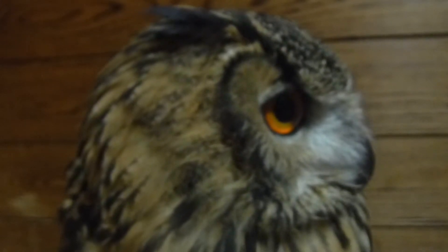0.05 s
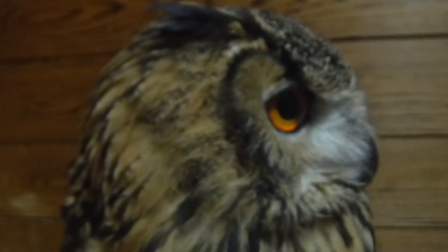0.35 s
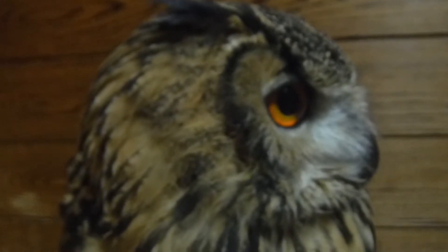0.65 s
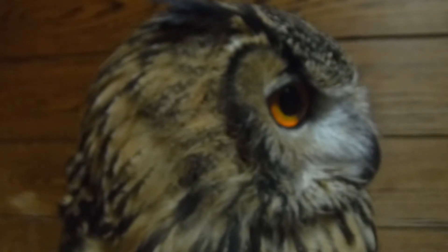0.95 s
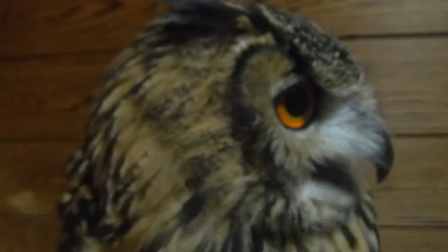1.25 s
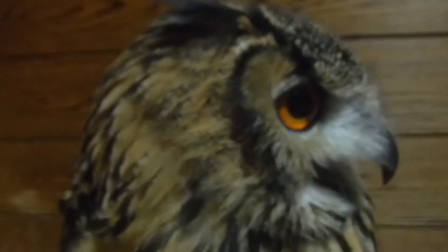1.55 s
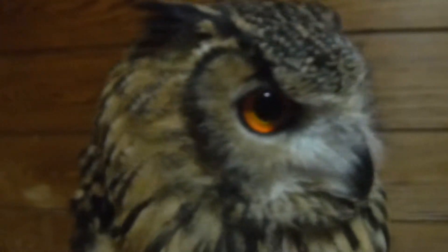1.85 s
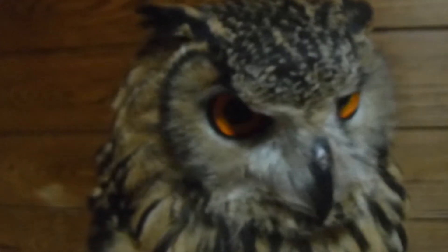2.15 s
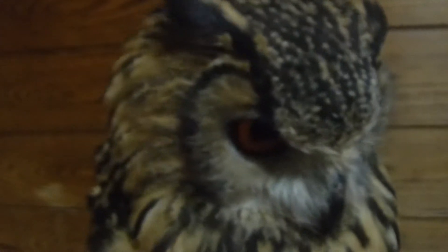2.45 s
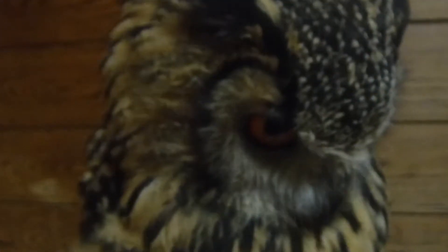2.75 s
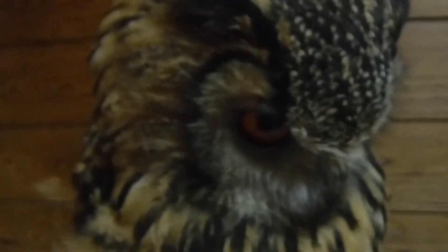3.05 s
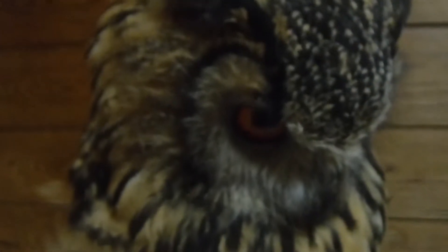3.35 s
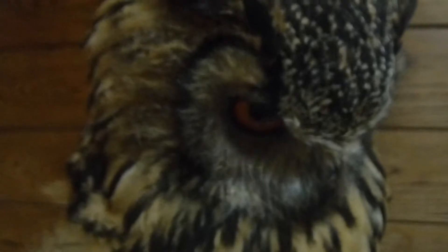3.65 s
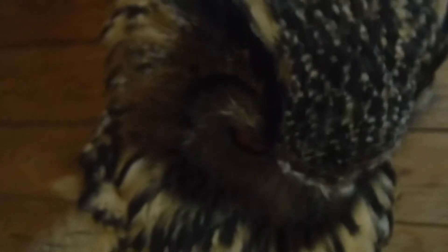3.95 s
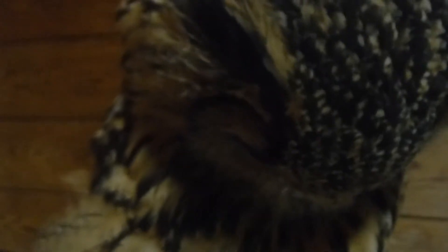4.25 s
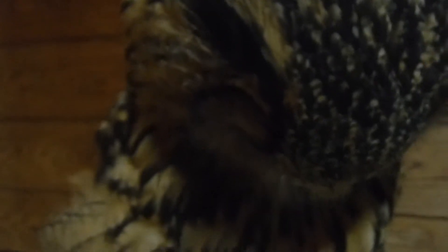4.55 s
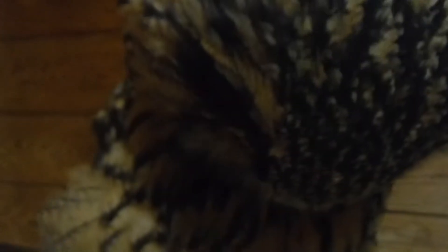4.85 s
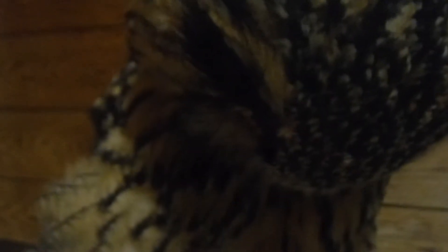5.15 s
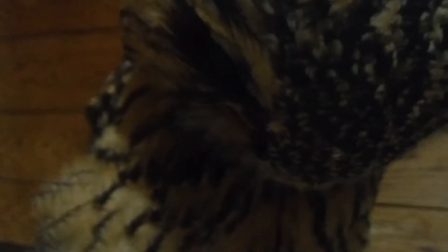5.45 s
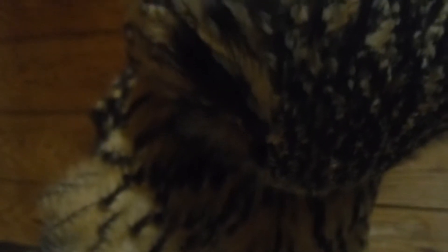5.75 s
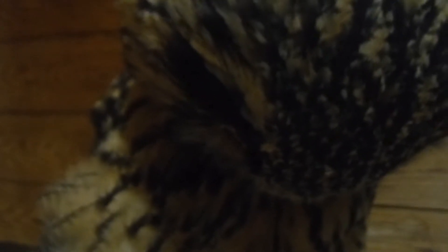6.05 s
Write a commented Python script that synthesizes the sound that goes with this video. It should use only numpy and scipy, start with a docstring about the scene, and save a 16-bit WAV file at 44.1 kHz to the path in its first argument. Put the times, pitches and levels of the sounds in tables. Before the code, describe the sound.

In a quiet wooden room, a large owl opens its beak with tiny wet clicks and lets out one short, loud screech. It starts as a croaky tone, breaks into a shrill, rasping whistle and slightly overloads the close microphone. After a pause comes a faint breathy swish, then a quick run of soft, muffled clucks. Faint hum, hiss and a little low handling rumble lie underneath.

```python
"""Eagle owl screech, close up.

A small wooden room, one microphone close to the bird. Its one screech overloads the input: the syrinx
croaks, rises to a clear tone, breaks into a shrill whistle over rasping air, and sputters out.
A faint, breathy swish starts suddenly and fades, then soft clucks pop behind the shut beak.
Underneath lie faint hum and hiss, and the low rumble and soft bumps of the microphone being handled."""
import sys
import numpy as np
from scipy import signal
from scipy.fft import rfft, irfft, next_fast_len
from scipy.io import wavfile

SR = 44100
rng = np.random.default_rng(int(sys.argv[2]) if len(sys.argv) > 2 else 0)


def wrap_up_sound(samples):
    """Save the sound to the file named by the first command line argument, as 16-bit audio."""
    columns = np.atleast_2d(samples).T
    # keep every value between -1 and 1, then stretch to whole-number steps
    tamed = np.clip(columns, -1, 1)
    steps = np.round(tamed * 32767).astype(np.int16)
    wavfile.write(sys.argv[1], SR, steps)


N = 278271
TIME = np.arange(N) / SR

# Air pressure behind the cry. Each row: time in seconds, effort in dB.
EFFORT = [(1.236, -36), (1.243, -24), (1.27, -16.5), (1.279, -7.5), (1.32, -2), (1.41, -0.5), (1.496, -4.8),
          (1.504, -12), (1.518, -17.5), (1.532, -34)]
# The low tone of the syrinx, and its shriek after the break. Each row: time in seconds, pitch in Hz.
TONE_PITCH = [(1.24, 750), (1.266, 833.4), (1.277, 751), (1.295, 769.3), (1.315, 803.4), (1.345, 826.2),
              (1.374, 828), (1.386, 880)]
SHRIEK_PITCH = [(1.385, 2538), (1.405, 2669), (1.447, 2644), (1.487, 2749), (1.498, 2490), (1.52, 2700)]
# The low tone catches again for an instant. Each row: time in seconds, level in dB.
RELAPSES = [(1.448, -11.5), (1.514, -12.5)]
# The open throat, for the tone and for the rasp. Each row: frequency in Hz, gain in dB.
TONE_COLOUR = [(200, -25), (500, -3), (820, -3), (1600, -4.5), (2450, -2), (3250, -2), (4050, -21),
               (5000, -5), (5800, -8.5), (7000, -12.5), (8500, -26.5), (12000, -57)]
RASP_COLOUR = [(50, -22), (250, -18), (500, -15), (900, -16), (1250, -18), (2000, -6.5), (2600, -1.5),
               (3100, -3), (3700, -1.3), (4400, -2.3), (5100, -2.8), (6400, -7.5), (7300, -20), (8400, -21),
               (12000, -49)]
# Bursts of air as the cry catches and as it dies.
# Each row: start and end in seconds, bursts a second, first and last level in dB.
SPUTTERS = [(1.2481, 1.27, 200, -23, -18), (1.503, 1.528, 265, -9, -15)]
# Croaks before the cry. Each row: start and length in seconds, pitch in Hz, level in dB.
CROAKS = [(1.2057, .0075, 558.3, -26), (1.2227, .0105, 679.7, -26.5)]
# Wet clicks as the beak opens. Each row: time in seconds, level in dB.
SMACKS = [(1.204, -21.5), (1.2109, -12.5), (1.2236, -18.5), (1.2332, -19.5)]
# Throat clucks. Each row: start in seconds, level in dB, number of pops, snap of the upper modes in dB.
CLUCKS = [(3.519, -39, 1, 8), (3.571, -36.5, 1, 0), (3.609, -42, 1, 0), (3.6528, -33.5, 1, 5),
          (3.6828, -37, 2, 0), (3.7229, -37, 1, -4), (3.731, -37, 1, 5), (3.738, -33.5, 2, 1),
          (3.7607, -32.5, 3, 9.5), (3.7795, -29, 3, 4), (3.8063, -30, 3, 7), (3.835, -28.5, 3, 9),
          (3.8634, -28.5, 3, 5.5), (3.9206, -27.5, 2, -5), (3.954, -41, 1, 0), (3.998, -31.5, 2, -1),
          (4.0433, -25, 1, -2)]
# The shut throat, four low and four upper modes. Each row: frequency in Hz, level in dB, t60 in seconds.
CLUCK_MODES = [(780, -19, .016), (865, .5, .019), (1040, -13, .024), (1830, -26, .017), (2720, -24, .0062),
               (3480, -28, .0085), (4620, -29, .008), (5115, -24, .0077)]
# Soft bumps of the microphone being handled. Each row: time in seconds, level in dB.
BUMPS = [(3.36, -49), (4.03, -52), (4.26, -52), (4.4, -50), (4.53, -53), (4.79, -47)]
# Spectra of the swish and of the handling rumble. Each row: frequency in Hz, gain in dB.
SWISH_COLOUR = [(150, -20), (300, -3), (520, 3), (680, -17), (1300, -11), (2300, -13), (4200, -21),
                (8000, -31)]
RUMBLE_COLOUR = [(15, -3.5), (40, 1.5), (85, -3.5), (160, -15), (500, -44.5)]
# Spectra of the wall reflections, the room air and the hiss. Each row: frequency in Hz, gain in dB.
WALL_COLOUR = [(100, -6), (500, 3.5), (900, 3.5), (1500, -1), (2700, -2.5), (5500, 0), (9000, -2.5),
               (14000, -11.5)]
AIR_COLOUR = [(20, 2), (50, 3), (130, -2), (215, -2), (275, 0.5), (330, -4), (600, -12.5), (1050, -15),
              (1280, -10), (1550, -14), (2050, -23), (4100, -25), (4400, -18.5), (5400, -26), (5900, -23.5),
              (8000, -29.5), (15500, -31)]
HISS_COLOUR = [(800, -30), (2200, -1.5), (4000, 2.5), (6500, -5), (10000, -25.5)]
# Hum and thin whine in the room. Each row: frequency in Hz, level in dB.
HUM = [(274.5, -61), (360.7, -71), (4382, -80), (4942, -78), (6842, -80), (13690, -88.5)]

# The voice locks into a clear tone, then breaks; each change of register takes a moment.
LOCK_S, BREAK_S, CHANGE_S = 1.273, 1.385, .01


def tone(effort_db, full_db=-.5, broken_drop_db=21, loose_rough=.9, locked_rough=.38, rough_per_db=.14):
    """The low voice follows the effort: rough at first, clear once locked, fitful after the break."""
    hz, = in_time(TONE_PITCH)
    locked = after(LOCK_S) - after(BREAK_S)
    rough = locked * np.clip(locked_rough + rough_per_db * effort_db, 0, 1) + (1 - locked) * loose_rough
    gain = from_db(full_db + effort_db - broken_drop_db * after(BREAK_S))
    gain += swells(RELAPSES, rise_s=.006, fall_s=.005)
    return syrinx(hz, 20 * np.log10(gain * during(EFFORT) + 1e-9), rough)


def syrinx(hz, level_db, rough, jitter=.085, shimmer_db=5.0, half_db=-10, slip_rad=.055, soft_tilt=.28):
    """Pulses shaped by the throat; alternate cycles differ, adding faint lines between the overtones."""
    phase = phase_of(hz * (1 + jitter * rough ** 2 * drift(300)))
    phase += slip_rad * drift(900)   # pulses come early or late, which blurs the high overtones
    on = level_db > -70
    hz, phase = hz[on], phase[on]
    halves = from_db(half_db) * rough[on] * (1 + .5 * drift(27)[on])
    wave, power = 0, 0
    for k in np.arange(1, 15):
        tilt = from_db(soft_tilt * level_db[on] * np.log2(k))   # a soft voice is duller
        gain = tilt * gain_at(TONE_COLOUR, k * hz)
        half_gain = tilt * halves * gain_at(RASP_COLOUR, (k + .5) * hz)
        lag = .048 * k * k   # the throat delays each overtone differently and smears the pulse
        wave += gain * np.sin(k * phase + lag) + half_gain * np.sin((k + .5) * phase + lag)
        power += gain ** 2 / 2
    out = np.zeros(N)
    out[on] = wave / np.sqrt(power)
    return out * from_db(level_db + shimmer_db * rough * np.tanh(drift(250)))


def shriek(effort_db, jitter=.03, shimmer_db=2.5, apart_hz=160, second_db=-6, attack_s=.016):
    """After the break the two sides of the syrinx whistle apart: they beat and couple into a sum tone."""
    hz, = in_time(SHRIEK_PITCH)
    first = phase_of(hz * (1 + jitter * drift(300)))
    second = phase_of((hz - apart_hz) * (1 + jitter * drift(300)))
    sum_tone = from_db(-2.8 + 2.8 * effort_db) * np.sin(first + second)
    wave = np.sin(first) + from_db(second_db) * np.sin(second) + sum_tone
    level_db = -.8 + 2.1 * effort_db + shimmer_db * np.tanh(drift(130))
    gate = after(BREAK_S + CHANGE_S / 2, attack_s) * during(EFFORT)
    return np.sqrt(2) * wave * from_db(level_db) * gate


def rasp(effort_db, full_db=-10.2, surge_db=7.2, lead_s=.007, flaps_per_s=200, unevenness=.25):
    """Rushing air surges just ahead of the break; at low pressure the membranes flap and chop it."""
    level_db = full_db + effort_db + surge_db * after(BREAK_S - lead_s)
    chopped_share = np.clip(.15 - .08 * effort_db, 0, 1)
    cycle = np.cumsum(flaps_per_s * (1 + unevenness * drift(90))) / SR % 1
    flaps = rms_one(np.exp(-9 * cycle))
    flow = from_db(level_db) * during(EFFORT) * (1 - chopped_share + chopped_share * flaps)
    return throat_air(flow + sputters())


def sputters(unevenness=.06, burst_s=.0018):
    """Airflow in runs of short, nearly regular bursts that grow or fade."""
    bursts = []
    for start, end, rate, first_db, last_db in SPUTTERS:
        for s in np.arange(start, end, 1 / rate):
            db = np.interp(s, [start, end], [first_db, last_db])
            bursts.append((s + unevenness * rng.standard_normal() / rate, db))
    return signal.lfilter([1], [1, -np.exp(-1 / (burst_s * SR))], clicks(bursts) + 1e-18)


def throat_air(flow):
    """Turbulence as strong as the flow, coloured by the open throat."""
    rms_gain = np.sqrt(np.mean(gain_at(RASP_COLOUR, np.linspace(0, SR / 2, num=1000)) ** 2))
    return coloured(flow * rng.standard_normal(N), RASP_COLOUR) / rms_gain


def croaks(edge_s=.0044, rough=.87, air_db=-15):
    """A few rough, airy cycles of the voice before the cry catches."""
    gain = sum(from_db(db) * (after(s, edge_s) - after(s + length, edge_s))
               for s, length, _, db in CROAKS)
    hz, = in_time([(s + length / 2, pitch) for s, length, pitch, _ in CROAKS])
    voiced = syrinx(hz, 20 * np.log10(gain + 1e-9), np.full(N, rough))
    return voiced + throat_air(from_db(air_db) * gain)


def smacks():
    """Short bright ticks of the parting beak and tongue."""
    hits = clicks(SMACKS)
    return ring(hits, hz=4487, t60=.003) * from_db(-6) - ring(hits, hz=5870, t60=.003) * from_db(-7)


def clucks(gap_s=.0048, unevenness=.046, loss_db=1.5, snap_loss_db=8, body_hz=(500, 1900), top_hz=5800):
    """Runs of pops, each weaker and duller than the last, muffled by the shut beak and the feathers."""
    bands = np.zeros((2, N))
    for s, db, count, snap_db in CLUCKS:
        for k in range(round(count)):
            start = int((s + k * gap_s * (1 + unevenness * rng.standard_normal())) * SR)
            sound = pop(db - k * loss_db, snap_db - k * snap_loss_db)
            bands[:, start:start + sound.shape[1]] += sound
    body, snap = bands
    return filtered(body, 2, body_hz, "band") + filtered(snap, 2, top_hz, "low")


def pop(db, snap_db, scatter=.035):
    """One pop of air rings the closed throat: a body of low modes and a snap of upper ones."""
    t = TIME[:SR // 20]
    hz, mode_db, t60 = np.transpose(CLUCK_MODES)[:, :, None]
    hz = hz * (1 + scatter * rng.standard_normal())   # the throat changes shape from pop to pop
    modes = from_db(db + mode_db - 60 * t / t60) * np.sin(2 * np.pi * hz * t)
    body = modes[:4].sum(axis=0)
    snap = from_db(snap_db) * (modes[4::2] - modes[5::2]).sum(axis=0)
    return np.array([body, snap])


def room(x, level_db=-21, first_echo_s=.0057, t60=.41, treble_t60=.33, treble_hz=4000):
    """Dense reflections reach the microphone off nearby wooden walls; the treble dies sooner."""
    t = TIME[:SR]
    echoes = rng.standard_normal(SR) * (t > first_echo_s)
    low = filtered(echoes, 1, treble_hz, "low")
    tail = low * from_db(-60 * t / t60) + (echoes - low) * from_db(-60 * t / treble_t60)
    tail = coloured(tail / np.sqrt(np.sum(tail ** 2)), WALL_COLOUR)
    return from_db(level_db) * signal.fftconvolve(x, tail)[:N]


def swish(swish_s=2.815, swish_db=-53.5):
    """A faint, breathy swish that starts suddenly and fades."""
    return swells([(swish_s, swish_db)], rise_s=.027, fall_s=.14) * noise(SWISH_COLOUR)


def handling(rumble_s=3.83, rumble_db=-47.5):
    """Low rumble and soft bumps of the microphone being handled."""
    rumble = swells([(rumble_s, rumble_db)], rise_s=.36, fall_s=.33)
    bumps = swells(BUMPS, rise_s=.035, fall_s=.05)
    return np.hypot(rumble, bumps) * noise(RUMBLE_COLOUR)


def background(air_db=-51.5, waver_hz=6.0, hiss_db=-62.5, fade_db_per_s=6.5):
    """Room tone: steady air, a wavering hum and a soft hiss that fades away."""
    hum = sum(from_db(db) * np.sqrt(2) * np.sin(phase_of(hz + waver_hz * drift(2.7))) for hz, db in HUM)
    air = from_db(air_db) * noise(AIR_COLOUR)
    hiss = from_db(hiss_db - fade_db_per_s * TIME) * noise(HISS_COLOUR)
    return air + hum + hiss


def from_db(db):
    """Decibels to gain."""
    return 10 ** (np.asarray(db) / 20)


def rms_one(x):
    """Scale to rms 1."""
    return x / np.sqrt(np.mean(x ** 2) + 1e-20)


def in_time(rows):
    """One curve for each column after the time, joined by straight lines."""
    s, *columns = np.transpose(rows)
    return [np.interp(TIME, s, c) for c in columns]


def during(rows):
    """1 between the first and the last row, else 0."""
    return (TIME > rows[0][0]) & (TIME < rows[-1][0])


def after(s, change_s=CHANGE_S):
    """Ramp from 0 to 1 around a moment."""
    return np.clip(.5 + (TIME - s) / change_s, 0, 1)


def swells(rows, rise_s, fall_s):
    """Gain that rises to each (s, dB) peak and dies away, both exponentially."""
    return sum(from_db(db) * np.exp(-np.maximum((s - TIME) / rise_s, (TIME - s) / fall_s))
               for s, db in rows)


def gain_at(spectrum, hz):
    """Read a spectrum on a log-frequency axis."""
    points, db = np.transpose(spectrum)
    return from_db(np.interp(np.log(hz + 1e-9), np.log(points), db))


def coloured(x, spectrum):
    """Causal (minimum-phase) filter with the given spectrum."""
    size = 2 * next_fast_len(len(x) // 2 + SR // 4)
    hz = np.arange(size // 2 + 1) * SR / size
    cepstrum = irfft(np.log(gain_at(spectrum, hz)))
    cepstrum[1:size // 2] *= 2
    cepstrum[size // 2 + 1:] = 0
    return irfft(rfft(x, size) * np.exp(rfft(cepstrum)))[:len(x)]


def filtered(x, order, hz, kind):
    """Low-, high- or band-pass filter."""
    return signal.sosfilt(signal.butter(order, hz, kind, fs=SR, output="sos"), x)


def noise(spectrum):
    """Coloured noise, rms 1."""
    return rms_one(coloured(rng.standard_normal(N), spectrum))


def drift(hz):
    """Smooth random wander up to about this rate, rms 1."""
    r = np.exp(-2 * np.pi * hz / SR)
    return rms_one(signal.lfilter([1], [1, -2 * r, r * r], rng.standard_normal(N + SR))[SR:])


def clicks(rows):
    """One impulse for each (s, dB) row."""
    s, db = np.transpose(rows)
    return np.bincount(np.round(s * SR).astype(int), from_db(db), N)


def ring(x, hz, t60):
    """A unit click sets a sine of height 1 ringing."""
    r, w = from_db(-60 / (t60 * SR)), 2 * np.pi * hz / SR
    return signal.lfilter([0, np.sin(w)], [1, -2 * r * np.cos(w), r * r], x + 1e-18)


def phase_of(hz):
    """Running phase of an oscillator."""
    return 2 * np.pi * np.cumsum(hz) / SR


def scene():
    """The owl close up, its room behind it; one microphone feeds both channels."""
    effort_db, = in_time(EFFORT)
    owl = smacks() + croaks() + tone(effort_db) + shriek(effort_db) + rasp(effort_db) + clucks()
    return np.tile(owl + room(owl) + handling() + swish() + background(), (2, 1))


def record(dry, ceiling=.88, hardness=6, bias=.05, spread_db=-13, bass_hz=260, cutoff_hz=15750):
    """The overloaded input flattens the peaks a little lopsidedly; the bass is thinned, the top cut."""
    driven = dry + bias
    clipped = driven / (1 + np.abs(driven / ceiling) ** hardness) ** (1 / hardness) - bias
    fizz = filtered(clipped[0] - dry[0], 8, 9500, "high")
    side = from_db(spread_db) * fizz * drift(600)   # the top of the distortion sounds a little wide
    stereo = clipped + [side, -side]
    thinned = stereo - .5 * filtered(stereo, 1, bass_hz, "low")
    return signal.fftconvolve(thinned, signal.firwin(601, cutoff_hz, fs=SR)[None], "same", axes=1)


dry = scene()
out = record(dry)
wrap_up_sound(out)
```